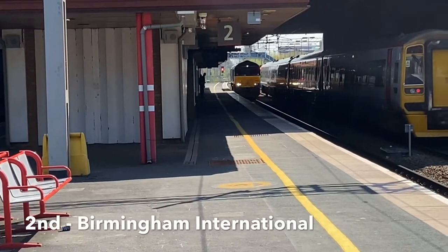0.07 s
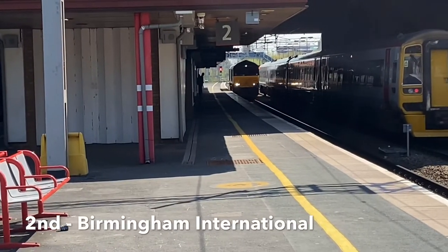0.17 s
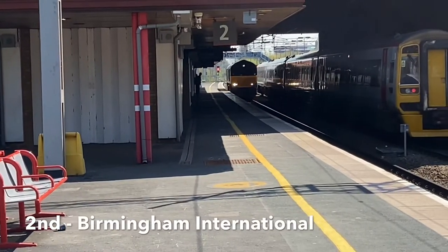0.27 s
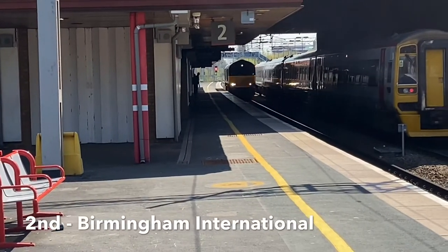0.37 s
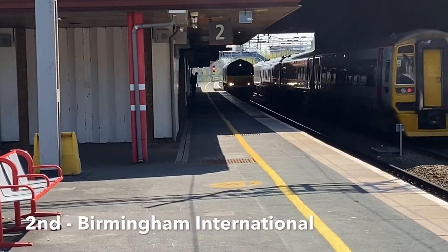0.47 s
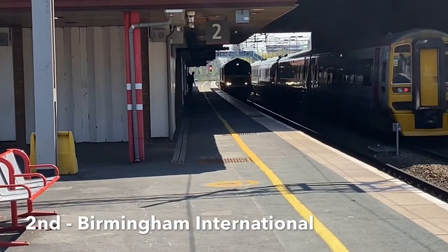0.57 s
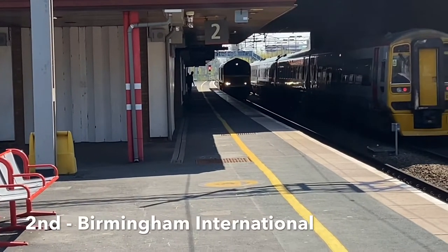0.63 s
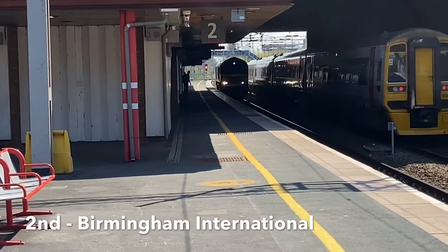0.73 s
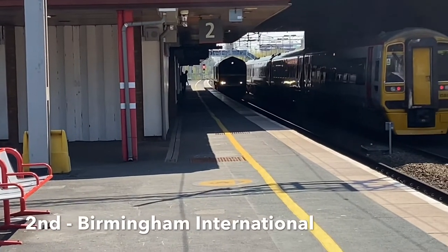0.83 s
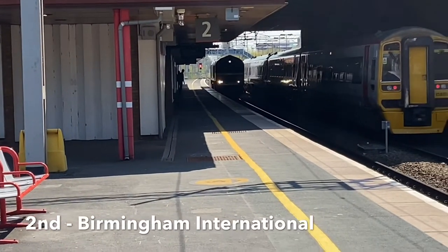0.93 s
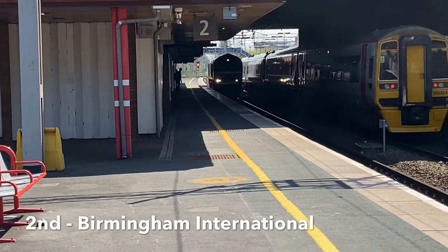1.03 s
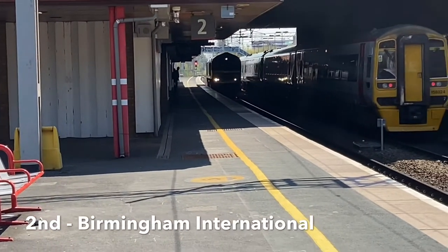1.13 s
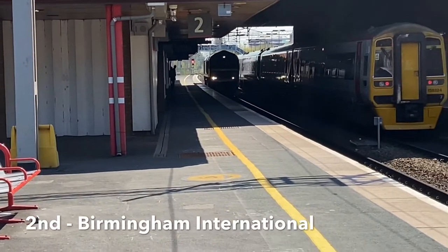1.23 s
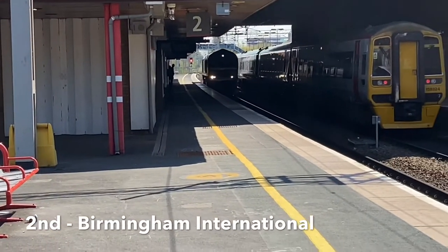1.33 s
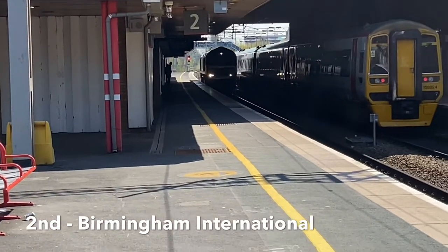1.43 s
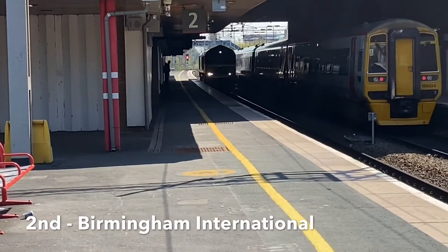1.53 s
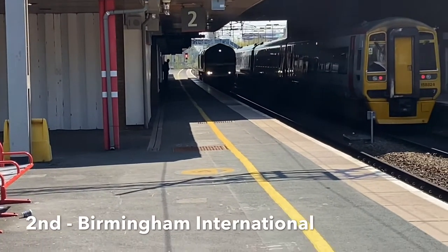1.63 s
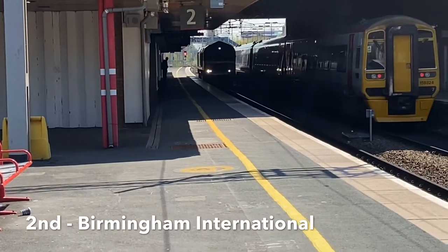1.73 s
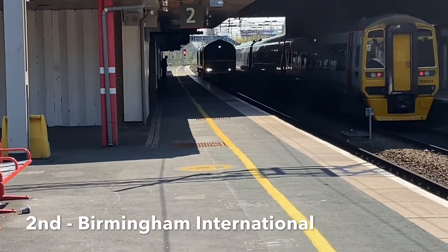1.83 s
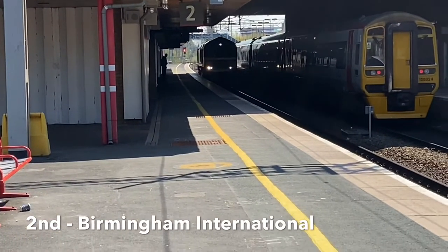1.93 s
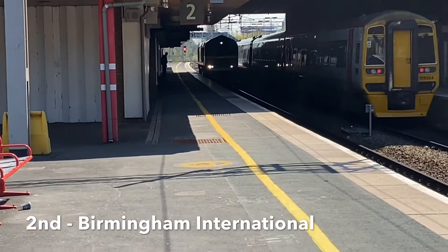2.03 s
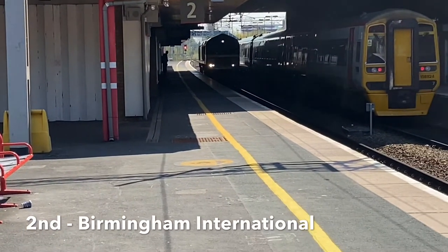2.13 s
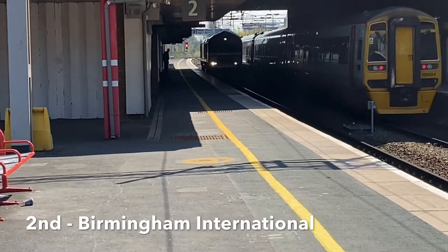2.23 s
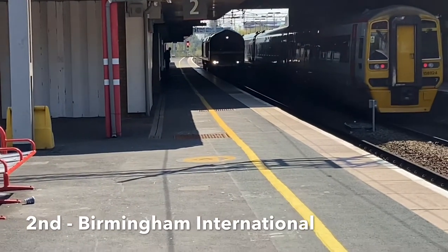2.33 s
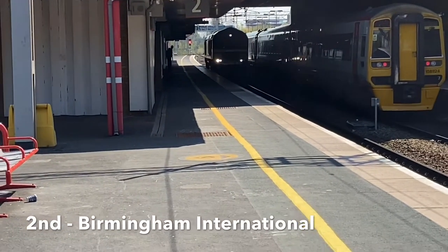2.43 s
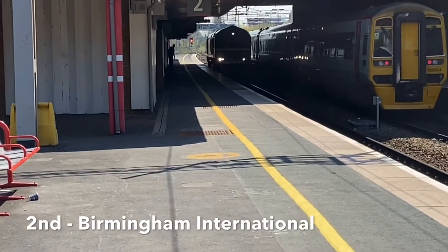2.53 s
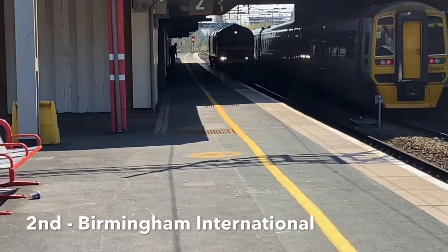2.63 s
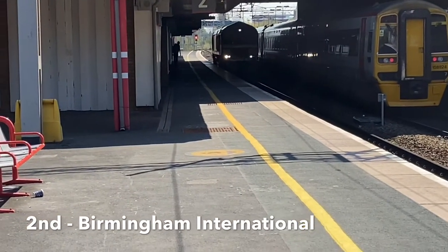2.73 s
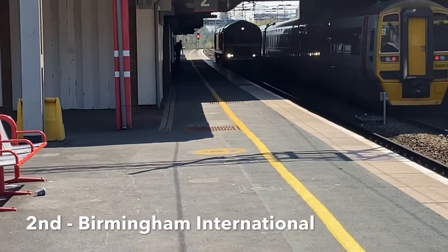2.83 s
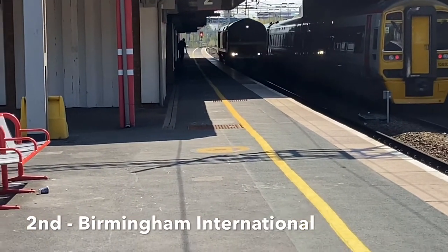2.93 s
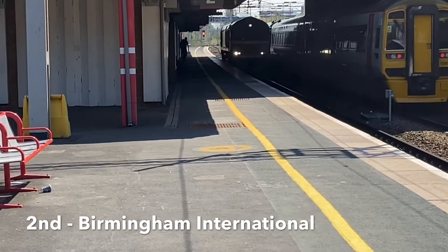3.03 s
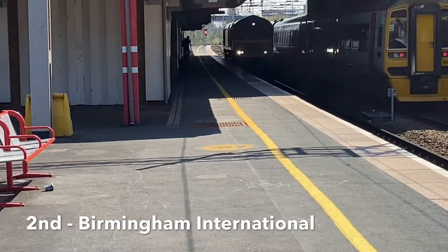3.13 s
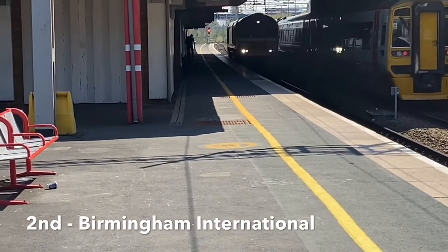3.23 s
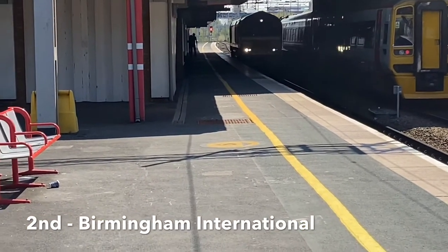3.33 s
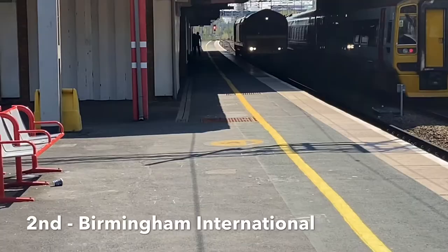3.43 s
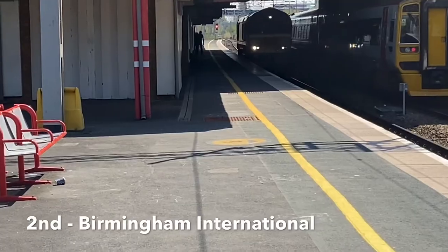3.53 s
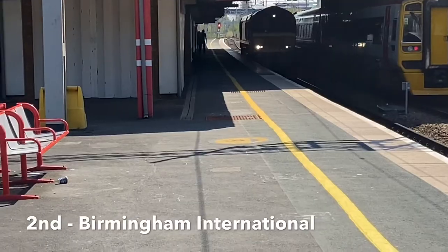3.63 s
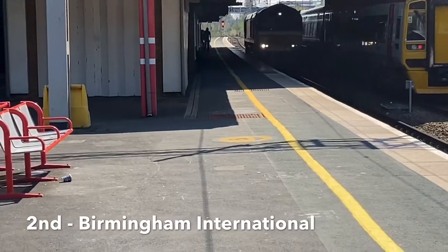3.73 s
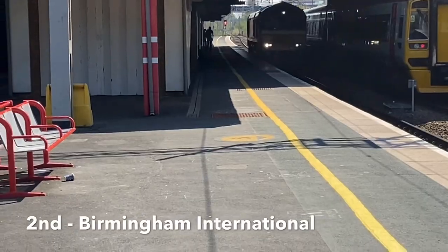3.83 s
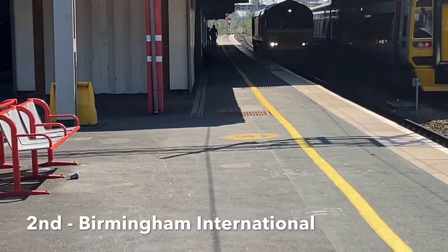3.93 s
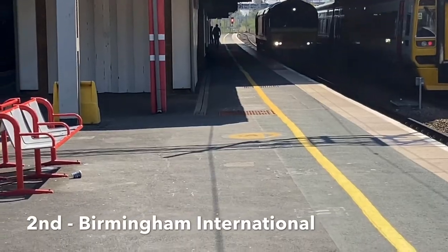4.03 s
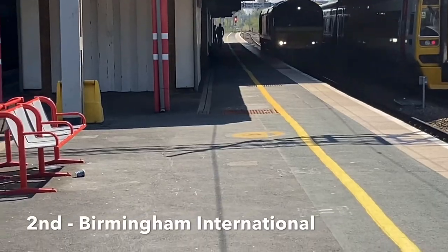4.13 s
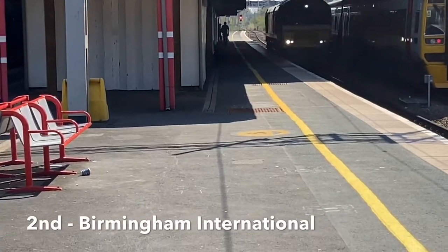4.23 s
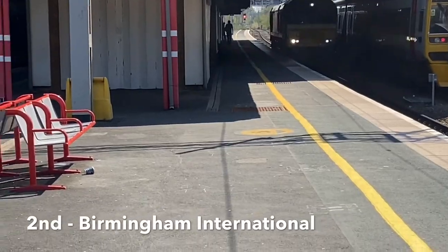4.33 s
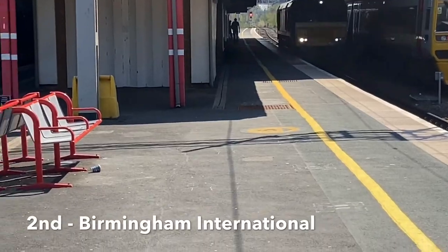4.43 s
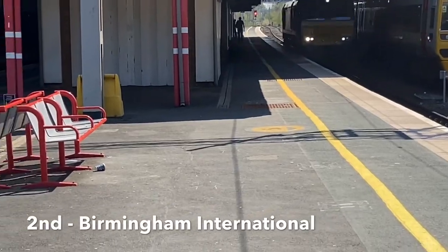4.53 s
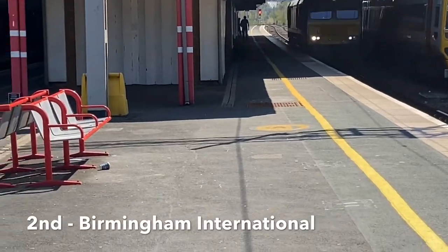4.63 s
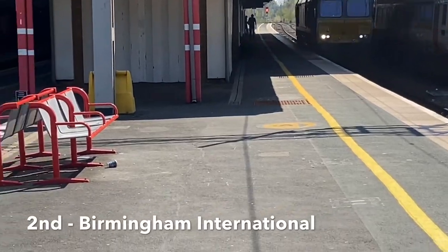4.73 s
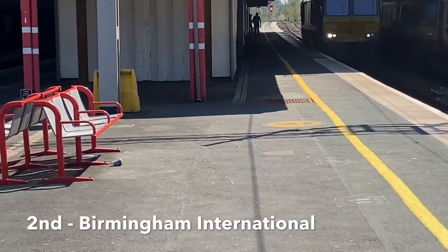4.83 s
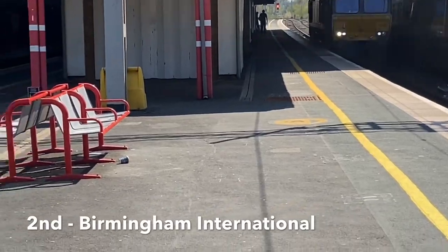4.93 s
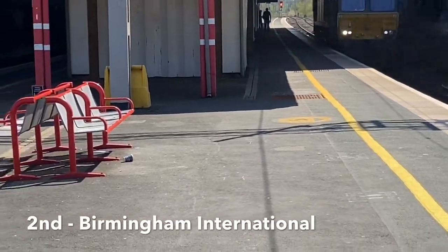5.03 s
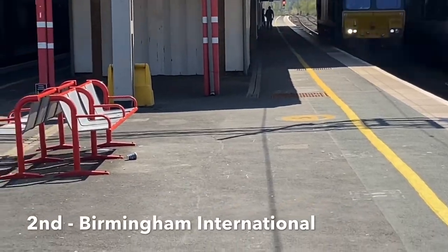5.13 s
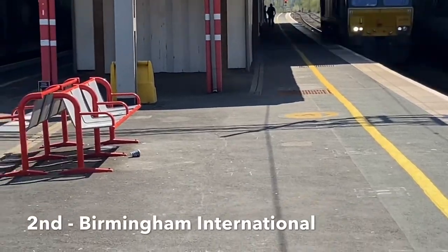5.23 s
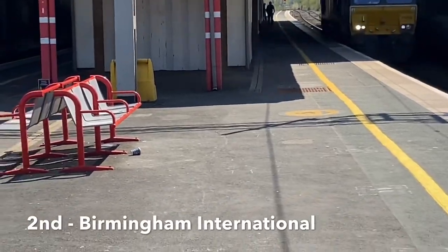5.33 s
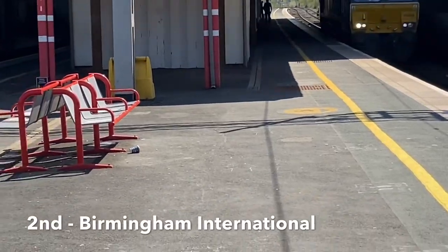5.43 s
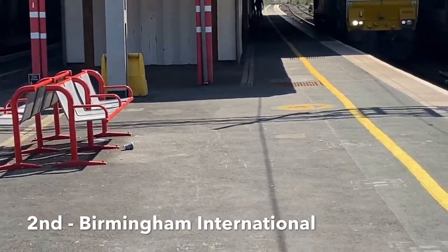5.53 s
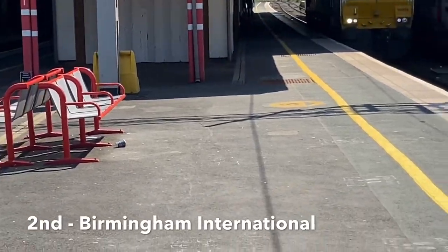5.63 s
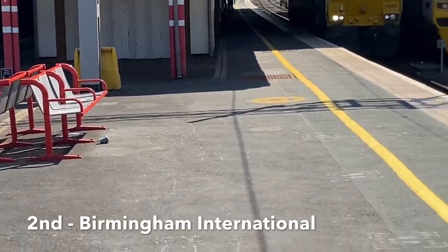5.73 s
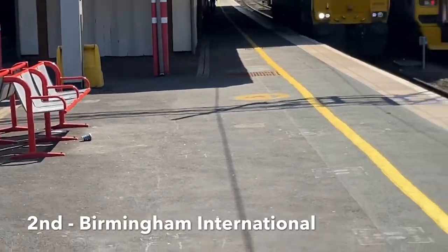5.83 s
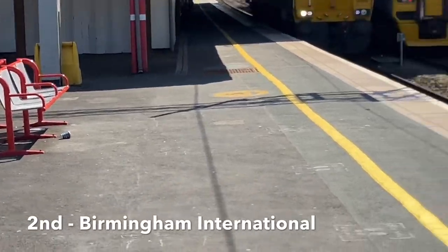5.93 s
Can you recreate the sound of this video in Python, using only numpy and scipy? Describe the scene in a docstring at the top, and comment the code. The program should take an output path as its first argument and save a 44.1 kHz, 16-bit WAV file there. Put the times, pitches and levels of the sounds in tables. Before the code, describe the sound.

A heavy diesel locomotive approaches through a covered station, its deep throbbing drone and roar swelling steadily, with a rising turbo whistle and late wheel clicks.

```python
"""A two-stroke diesel locomotive nears through a covered station, its shaft gaining speed late on.
Shaft-locked tones and firing puffs throb; shaped noise makes the exhaust roar, machinery rush and wheel hiss.
Noise-smeared tones give the gear hum and turbocharger whistle; a parked train rumbles and whines faintly.
Dying noise bursts make knocks, clicks and ticks, short tones the faint high swells, squeaks and scrapes;
all these echo under the roof. The microphone rounds off the loudest peaks."""
import sys
import numpy as np
from scipy import signal
from scipy.fft import rfft, irfft, next_fast_len
from scipy.io import wavfile
from scipy.ndimage import uniform_filter1d, map_coordinates

SR = 44100
rng = np.random.default_rng(int(sys.argv[2]) if len(sys.argv) > 2 else 0)


def log_audio(samples):
    """Write samples as a 16-bit WAV file to the path given in sys.argv[1]."""
    # one column per channel
    frames = np.atleast_2d(samples).T
    # limit to full scale, then quantise
    limited = np.clip(frames, -1, 1)
    pcm = np.round(limited * 32767).astype(np.int16)
    wavfile.write(sys.argv[1], SR, pcm)


N = 264159  # samples

# Loudness of the approach; sets the fifth order, machinery and hiss. Each row: time in seconds, level in dB.
APPROACH_S_DB = [(0, -44.5), (1.4, -39.5), (2.4, -34.5), (3.3, -33), (3.6, -29.5), (4.25, -27), (4.6, -25),
                 (5.5, -23), (5.99, -21.5)]
# Share of the sound that comes straight from the locomotive. Each row: time in seconds, gain in dB.
DIRECT_S_DB = [(0, -26), (3.3, -11), (3.5, -7.5), (4.5, -7), (4.9, -4.5), (5.99, -1)]
# Stereo width of the noise layers. Each row: frequency in Hz, side against mid in dB.
WIDTH_HZ_DB = [(30, -16.5), (90, -19.5), (180, -22), (350, -16), (700, -10), (1300, -10), (1750, -6.5),
               (2050, -59.5), (3000, -48), (5300, -43), (6000, -31.5), (7000, -14), (9000, 4)]
WIDEN_DB = 3  # extra side level from nearness 0 to 1

# The shaft runs evenly, then the throttle opens and it gains speed.
THROTTLE_S, SHAFT_HZ, SHAFT_GAIN_HZ_PER_S = 3.8, 14.1, .5
# Deep drone, rising and falling among the station's echoes. Each row: time in seconds, level in dB.
DRONE_S_DB = [(0, -39), (.58, -40), (.68, -34), (.85, -36.5), (1.2, -37.5), (1.8, -25.5), (2.1, -27.5),
              (2.35, -35.5), (2.67, -22.5), (3.0, -24), (3.45, -19), (3.7, -25.5), (3.95, -18),
              (4.7, -17.5), (4.95, -18.5), (5.17, -12), (5.6, -18.5), (5.99, -18)]
# Weaker low tones of engine and fans. Each row: multiple of the shaft speed, dB re throb.
ORDERS_MULTIPLE_DB = [(4, -12.5), (6, -13.5), (7.3, -9.5)]
# Exhaust throb, stepping up as the locomotive clears the parked train. Each row: time in seconds, level in dB.
THROB_SWELL_S_DB = [(0, -44), (.3, -35), (.55, -41), (.7, -36.5), (1.4, -35), (1.85, -36.5), (2.2, -32),
                    (2.55, -34.5), (2.8, -33.5), (2.97, -29), (3.3, -29), (3.48, -24), (3.9, -25.5),
                    (4.55, -20), (4.85, -18.5), (5.3, -16.5), (5.8, -16), (5.99, -14)]
# Swells of the fifth order. Each row: centre in seconds, half length in seconds, boost in dB.
BOOMS_S_S_DB = [(2.96, 0.08, 9), (4.248, .15, 5), (5.004, 0.05, 12), (5.674, 0.069, 11), (5.96, .03, 4)]
# Beats of the exhaust's upper throb. Each row: centre in seconds, half length in seconds, level in dB.
BEATS_S_S_DB = [(2.25, .06, -28), (3.5, 0.037, -17.5), (3.645, 0.028, -16), (3.8, 0.038, -17),
                (4.03, .05, -22), (4.56, .05, -15), (4.67, 0.044, -18), (5.44, 0.043, -13),
                (5.85, 0.028, -14)]
BEAT_ORDER = 7.4  # multiple of the shaft speed
# Exhaust roar. Each row: time in seconds, level in dB.
ROAR_SWELL_S_DB = [(0, -41), (1.4, -34), (2.4, -29.5), (2.95, -31), (3.3, -28.5), (3.6, -25), (4.25, -22.5),
                   (4.6, -19.5), (5.5, -18), (5.99, -16.5)]
# Gear and blower whines, and a broad ring that sounds mostly from afar (second row). Each row: multiple of the
# # shaft speed, width in Hz, far and near levels in dB re machinery.
WHINES_MULTIPLE_HZ_DB_DB = [(21.3, 25, -14, -3.5), (52.2, 200, -5, -22), (78.7, 90, -28.5, -5.5),
                            (157.4, 300, -27.5, -8), (317, 200, -29.5, -22)]
# Hum of the traction gears, tied to the even road speed. Each row: time in seconds, level in dB.
GEAR_HUM_S_DB = [(0, -60.5), (1.5, -48), (2.35, -43), (3.3, -40.5), (3.9, -38), (4.55, -30), (5.2, -44),
                 (5.6, -34.5), (5.88, -30)]
GEAR_HZ, GEAR_WIDTH_HZ = 655, 58

# Turbocharger blade tone: idles, then spools up. Each row: time in seconds, pitch in Hz.
TURBO_PITCH_S_HZ = [(0, 2495), (2.0, 2508), (2.6, 2475), (3.8, 2495), (4.6, 2540), (4.95, 2578),
                    (5.18, 2580), (5.5, 2630), (5.57, 2668), (5.73, 2712), (5.86, 2708), (5.99, 2745)]
# Whistle reference level among the station's walls. Each row: time in seconds, level in dB.
WHISTLE_S_DB = [(0, -72.5), (1.1, -66), (1.35, -58), (1.6, -57.5), (2.04, -50.5), (2.2, -56), (2.55, -49.5),
                (3.3, -52), (4.6, -44), (4.91, -40.5), (5.16, -36), (5.3, -37.5), (5.5, -34), (5.75, -38),
                (5.85, -30.5), (5.99, -31)]
# Echoes on slanting paths, with less Doppler shift. Each row: share of the pitch, width in Hz, dB re whistle.
WHISTLE_ECHOES_SHARE_HZ_DB = [(.982, 60, -5), (.945, 90, -4.5)]
# The stack is in plain view, the whistle rings clean. Each row: centre in seconds, half length in seconds,
# added level in dB.
CLEAN_WHISTLE_S_S_DB = [(5.01, .04, -36.5), (5.15, .05, -34.5), (5.59, .04, -34.5), (5.68, .04, -35),
                        (5.77, .04, -34.5)]
# Whistle octave. Each row: time in seconds, dB re whistle.
OCTAVE_S_DB = [(0, -17.5), (4.8, -19), (5.15, -16.5), (5.33, -12.5), (5.5, -18), (5.6, -24)]

# Parked train's steady tones. Each row: frequency in Hz, level in dB.
IDLING_HZ_DB = [(127, -46.5), (173, -51.5), (316, -49.5), (1475, -63), (2203, -72), (2304, -58.5)]
IDLE_RUMBLE_DB, IDLE_THROB_DB = -39, -43.5

# Knocks of the running gear. Each row: start in seconds, relative thud in dB, relative hiss in dB.
KNOCKS_S_DB_DB = [(0.665, -11, -57), (1.0, -15, -87), (3.43, -11.5, -48.5), (4.53, -7, -55),
                  (4.81, 1.5, -39.5), (5.66, -11, -40.5), (5.78, -3, -38)]
# Brief, faint high tones: swells of the turbo whistle and its octave, and wheel squeaks. Each row: centre in
# seconds, pitch in Hz, level in dB.
HIGH_TONES_S_HZ_DB = [(.848, 4060, -60), (1.34, 4960, -68), (1.34, 2490, -55), (1.52, 4530, -64),
                      (1.56, 4950, -65), (1.57, 2490, -53), (1.8, 4950, -68), (2.0, 4950, -64),
                      (2.22, 4530, -60), (2.76, 4500, -62), (3.02, 4500, -61)]
# Steel scrapes on the running gear. Each row: centre in seconds, half length in seconds, pitch in Hz, level in dB.
SCRAPES_S_S_HZ_DB = [(4.92, .016, 1525, -29.5), (5.53, .09, 2200, -40)]
# Wheel clicks and ballast ticks. Each row: start in seconds, relative level in dB.
CLICKS_S_DB = [(1.314, -52), (5.681, -29), (5.7535, -33), (5.778, -14.5), (5.788, -29), (5.801, -31),
               (5.8213, -23), (5.831, -31), (5.8445, -24), (5.871, -29)]
# Fine grit around the clicks: centre in seconds, spread in seconds, relative level in dB.
GRIT_S_S_DB = (5.82, .06, -43)
# Faint, bright tick near the microphone. Each row: start in seconds, level in dB.
NEAR_TICK_S_DB = [(2.565, -70)]

# Noise colours. Each row: frequency in Hz, relative level in dB per Hz.
THROB_HZ_DB = [(18, -46), (32, -17.5), (48, -6), (60, 2), (75, -4), (88, 1.5), (108, 1.5), (130, 0),
               (180, -20.5), (300, -89)]
ROAR_HZ_DB = [(60, -49), (105, -15), (135, -1), (185, 0.5), (230, -6), (300, -5), (390, -8), (460, -8.5),
              (550, -20), (750, -21), (1500, -81)]
MACHINERY_HZ_DB = [(300, -12.5), (540, -3.5), (690, 0.5), (820, -2.5), (1000, -5), (1400, -8), (1650, -7),
                   (1850, -12.5), (2200, -10), (2550, -16), (2850, -23), (3400, -30), (4300, -54.5),
                   (7000, -90.5)]
HISS_FAR_HZ_DB = [(1500, -6.5), (3000, 12), (3400, 7.5), (4000, 3), (4800, -0.5), (5500, -11), (7000, -15),
                  (8300, -29), (11000, -34.5), (14000, -49.5)]
HISS_NEAR_HZ_DB = [(1500, -24.5), (3100, 7.5), (4200, 1.5), (5000, 3), (5800, -8.5), (7000, -8.5),
                   (8400, -24.5), (12000, -23.5), (14000, -45.5)]
KNOCK_HZ_DB = [(50, -13.5), (175, 6), (300, -1.5), (700, -20.5), (2000, -30.5), (6000, -66), (12000, -110)]
PUFF_HZ_DB = [(1500, -12), (3500, -4), (5000, -2), (7000, -3.5), (8300, -14), (9500, -18), (12000, -16),
              (13500, -45)]
TICK_HZ_DB = [(900, -14), (2000, 0), (3900, 10), (6400, 4), (8500, -18), (10000, -16), (12300, -12),
              (14500, -28)]
NEAR_TICK_HZ_DB = [(3000, -35), (7500, -6), (10500, -2), (13500, -14)]
# Roof echo. Each row: frequency in Hz, 60 dB decay time in seconds.
ROOF_HZ_S = [(100, 0.64), (1000, .6), (8000, 0.4)]
LOW_CUT_HZ, TOP_HZ = 33, 14400  # half-gain points of the microphone


def amp(db):
    """Decibels to gain."""
    return 10 ** (np.asarray(db) / 20)


def unit(x):
    """Scale to rms 1."""
    return x / np.sqrt(np.mean(x ** 2) + 1e-20)


def seconds():
    """Time of every sample."""
    return np.arange(N) / SR


def along(points, hz):
    """Interpolate (Hz, value) points on a log frequency axis."""
    f, v = np.transpose(points)
    return np.interp(np.log(hz + 1), np.log(f + 1), v)


def curve(rows):
    """Interpolate (s, value) rows to one value per sample."""
    s, value = np.transpose(rows)
    return np.interp(seconds(), s, value)


def swells(rows):
    """Sum of bell-shaped gains from (s, half length s, dB) rows."""
    return sum(amp(db) * np.exp(-((seconds() - s) / half_s) ** 2) for s, half_s, db in rows)


def wobble(rate_hz):
    """Smooth random curve with rate_hz knots a second."""
    knots = rng.standard_normal(int(N * rate_hz / SR) + 4)
    grid = np.arange(0, N, 16)  # spline every 16 samples, straight lines between
    return np.interp(np.arange(N), grid, map_coordinates(knots, [grid * rate_hz / SR]))


def filtered(x, response):
    """Multiply the spectrum of x by a response of frequency."""
    m = next_fast_len(N + SR // 2)
    return irfft(rfft(x, m) * response(np.fft.rfftfreq(m, 1 / SR)), m)[..., :N]


def coloured(x, spectrum):
    """Shape x by a (Hz, dB) spectrum."""
    return filtered(x, lambda hz: amp(along(spectrum, hz)))


def nearness():
    """Share of direct sound, 0-1."""
    return np.clip(amp(curve(DIRECT_S_DB)), 0, 1)


def approach(close_db, growth):
    """Gain that follows the approach: growth in dB per dB, close_db at its loudest."""
    loudness_db = curve(APPROACH_S_DB)
    return amp(close_db + growth * (loudness_db - loudness_db.max()))


def spread(pair, spectrum):
    """Colour two signals as mid and side; the stereo image widens with nearness; rms 1."""
    mid, side = coloured(pair, spectrum)
    side = coloured(side, WIDTH_HZ_DB) * amp(WIDEN_DB * (nearness() - .5))
    return unit(np.array([mid + side, mid - side]))


def rush(spectrum, patchy_db):
    """Stereo noise with time-frequency patches of random gain, as reflections come and go."""
    z = signal.stft(rng.standard_normal((2, N)), nperseg=1024)[2]
    field = uniform_filter1d(rng.standard_normal(z.shape[1:]), size=3, axis=0)  # across frequency
    field = uniform_filter1d(field, size=14, axis=1)  # across time
    noise = signal.istft(z * amp(patchy_db * unit(field)), nperseg=1024)[1]
    return spread(noise[:, :N], spectrum)


def tone(angle, fading_db):
    """Sine of rms 1 that fades in and out among its echoes."""
    return unit(np.sin(angle + rng.uniform(0, 2 * np.pi)) * amp(fading_db * wobble(3.055)))


def whine(angle, width_hz):
    """Tone of rms 1 smeared into a narrow band by many moving reflections."""
    return unit(wobble(width_hz) * np.cos(angle) + wobble(width_hz) * np.sin(angle))


def bursts(rows, spectrum, t60_s, attack_s, gain_db):
    """Coloured noise gated into short dying puffs, one per (s, dB) row."""
    envelope = np.zeros(N)
    for s, db in rows:
        age_s = np.maximum(seconds() - s, 0)
        rise = 1 - np.exp(-(age_s / attack_s) ** 2)
        envelope += amp(db - 60 * age_s / t60_s) * rise
    return amp(gain_db) * envelope * unit(coloured(rng.standard_normal(N), spectrum))


def shaft_angle(waver=.006):
    """Crankshaft angle in radians; the governor lets the speed waver a little."""
    open_s = np.maximum(seconds() - THROTTLE_S, 0)
    speed_hz = (SHAFT_HZ + SHAFT_GAIN_HZ_PER_S * open_s) * (1 + waver * wobble(3))
    return 2 * np.pi * np.cumsum(speed_hz) / SR


def drone(angle):
    """Unequal cylinders sound the second and third shaft orders, which beat over a deep rumble."""
    third = tone(3 * angle, fading_db=.8)
    second = amp(-3) * tone(2 * angle, fading_db=1.5)
    rumble = amp(-7) * whine(3.3 * angle, width_hz=30)
    return amp(curve(DRONE_S_DB)) * (third + second + rumble)


def exhaust(angle):
    """Twelve firings a turn puff unequally over low orders; a roar pulses in step with the fifth order."""
    firing = np.diff(np.floor(12 * angle / (2 * np.pi)), prepend=0)
    lope = 1 + 0.26 * np.cos(angle)  # once a turn
    puffs = firing * (0.14 + rng.standard_normal((2, N))) * lope
    orders = sum(amp(db) * tone(k * angle, fading_db=2) for k, db in ORDERS_MULTIPLE_DB)
    throb = amp(curve(THROB_SWELL_S_DB)) * (orders + spread(puffs, THROB_HZ_DB))

    boom_db = sum(db * np.exp(-((seconds() - s) / half_s) ** 2) for s, half_s, db in BOOMS_S_S_DB)
    fifth = approach(close_db=-15.5, growth=1.44) * amp(boom_db) * tone(5 * angle, fading_db=0.7)
    beats = swells(BEATS_S_S_DB) * tone(BEAT_ORDER * angle, fading_db=1.0)

    chuff = 1 + 0.23 * np.cos(5 * angle)  # gas leaves in step with the strong order
    roar = amp(curve(ROAR_SWELL_S_DB)) * unit(chuff * rush(ROAR_HZ_DB, patchy_db=0.5))
    return fifth + throb + beats + roar


def machinery(angle):
    """Fans, gears and rolling wheels: a broad rush plus whines whose balance shifts with nearness."""
    near = nearness()
    total = rush(MACHINERY_HZ_DB, patchy_db=1) * amp([[-.4], [.4]])  # leans right
    for k, width_hz, far_db, near_db in WHINES_MULTIPLE_HZ_DB_DB:
        total = total + amp(far_db + (near_db - far_db) * near) * whine(k * angle, width_hz)
    return approach(close_db=-24, growth=0.96) * total


def gears(side_db=-9, lean_db=1):
    """Traction gears hum in a narrow band, to the right and spread by the walls."""
    gear_angle = 2 * np.pi * GEAR_HZ * seconds()
    mid = whine(gear_angle, GEAR_WIDTH_HZ)
    side = amp(side_db) * whine(gear_angle, GEAR_WIDTH_HZ)
    pair = unit(np.array([mid + side, mid - side]))
    return amp(curve(GEAR_HUM_S_DB)) * amp([[-lean_db], [lean_db]]) * pair


def turbo(direct_db=-11, smear_db=-7, rush_db=-8):
    """Blade tone in a skirt of rushing air, with smeared echoes at and below its pitch and a patchy octave."""
    pitch_hz = curve(TURBO_PITCH_S_HZ) * (1 + .0018 * wobble(30))
    blades = 2 * np.pi * np.cumsum(pitch_hz) / SR
    level = amp(curve(WHISTLE_S_DB))

    direct = tone(blades, fading_db=.5) * amp(1.5 * wobble(35))
    direct = direct * (level * amp(direct_db) + swells(CLEAN_WHISTLE_S_S_DB))
    echoes = amp(smear_db) * whine(blades, width_hz=60)
    for share, width_hz, db in WHISTLE_ECHOES_SHARE_HZ_DB:
        echoes = echoes + amp(db) * whine(share * blades, width_hz)
    skirt = amp(rush_db) * whine(blades, width_hz=650)
    octave = amp(curve(OCTAVE_S_DB) + 3 * wobble(14)) * whine(1.995 * blades, width_hz=190)
    return direct + level * (echoes + skirt + octave)


def rails():
    """Wheel hiss, crossfading from dull under the roof to brighter as the wheels come into view."""
    near = nearness()
    far = np.sqrt(1 - near ** 2)
    hiss = near * rush(HISS_NEAR_HZ_DB, patchy_db=1) + far * rush(HISS_FAR_HZ_DB, patchy_db=1)
    return approach(close_db=-38, growth=0.97) * hiss


def parked_train():
    """Train idling at the far platform: steady tones over rumbling noise."""
    t = seconds()
    tones = sum(amp(db) * tone(2 * np.pi * hz * t + .5 * wobble(6), fading_db=1.5) for hz, db in IDLING_HZ_DB)
    rumble = amp(IDLE_RUMBLE_DB) * rush(ROAR_HZ_DB, patchy_db=0.0)
    return tones + rumble + amp(IDLE_THROB_DB) * rush(THROB_HZ_DB, patchy_db=7.0)


def knocks():
    """Running gear thuds, each with a softly swelling puff of hiss."""
    thud_rows = [(s, db) for s, db, _ in KNOCKS_S_DB_DB]
    hiss_rows = [(s, db) for s, _, db in KNOCKS_S_DB_DB]
    thuds = bursts(thud_rows, KNOCK_HZ_DB, t60_s=0.69, attack_s=.012, gain_db=-15.5)
    return thuds + bursts(hiss_rows, PUFF_HZ_DB, t60_s=0.45, attack_s=0.03, gain_db=-5)


def high_tones_and_scrapes(high_half_s=0.029):
    """Turbo swells, wheel squeaks and scrapes: thin, wavering tones that swell and die."""
    rows = [(s, high_half_s, hz, db) for s, hz, db in HIGH_TONES_S_HZ_DB] + SCRAPES_S_S_HZ_DB
    waver = 2 * np.pi * np.cumsum(1 + .009 * wobble(160)) / SR  # phase per Hz of pitch
    return sum(swells([(s, half_s, db)]) * np.sqrt(2) * np.sin(hz * waver) for s, half_s, hz, db in rows)


def clicks(grit_count=20):
    """Wheel clicks and ballast ticks, with randomly scattered grit as the wheels shake the ballast."""
    centre_s, scatter_s, level_db = GRIT_S_S_DB
    draws = rng.standard_normal((grit_count, 2))
    grit = [(centre_s + scatter_s * when, level_db + 2 * size) for when, size in draws]
    return bursts(CLICKS_S_DB + grit, TICK_HZ_DB, t60_s=.011, attack_s=.0005, gain_db=-2)


def near_tick():
    """One faint burst of bright noise."""
    return bursts(NEAR_TICK_S_DB, NEAR_TICK_HZ_DB, t60_s=.2, attack_s=.003, gain_db=0)


def roof(x):
    """Canopy echo: convolution with decaying stereo noise whose treble dies first."""
    hz, t, z = signal.stft(rng.standard_normal((2, SR // 2)), SR, nperseg=256)
    decay = amp(-60 * t / along(ROOF_HZ_S, hz)[:, None])
    tail = signal.istft(z * decay, SR, nperseg=256)[1]
    return signal.fftconvolve(x[None], tail / np.linalg.norm(tail[0]), axes=1)[:, :N]


def scene():
    """Locomotive, rails and parked train, plus short hits and tones with their roof echo."""
    angle = shaft_angle()
    engine = drone(angle) + exhaust(angle) + machinery(angle) + gears() + turbo()
    hits = knocks() + high_tones_and_scrapes() + clicks() + near_tick()
    return engine + rails() + parked_train() + hits + amp(-20.0) * roof(hits)


def record(dry):
    """The microphone drops the deepest bass, rounds off the loudest peaks and is band limited."""
    heard = filtered(dry, lambda hz: 1 - 1 / (1 + (hz / LOW_CUT_HZ) ** 12))
    rounded = heard / (1 + np.abs(heard / 1.02) ** 10) ** (1 / 10)  # saturates at 1.02
    return filtered(rounded, lambda hz: 1 / (1 + (hz / TOP_HZ) ** 60))


dry = scene()
out = record(dry)
log_audio(out)
```